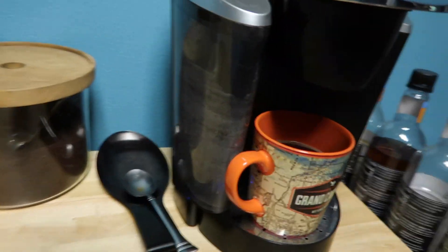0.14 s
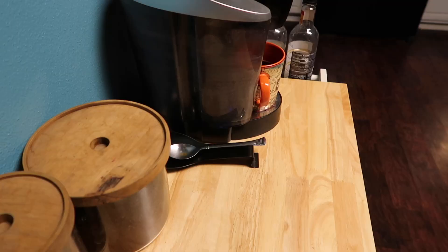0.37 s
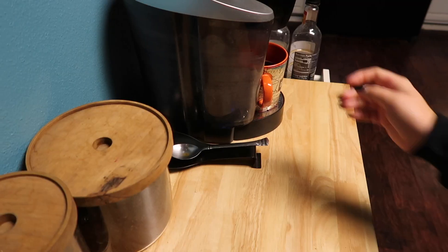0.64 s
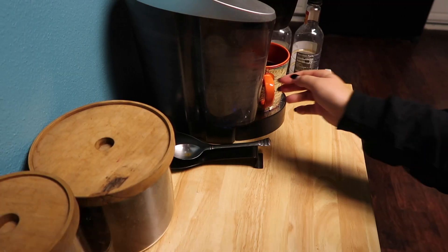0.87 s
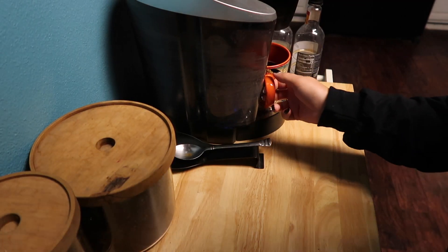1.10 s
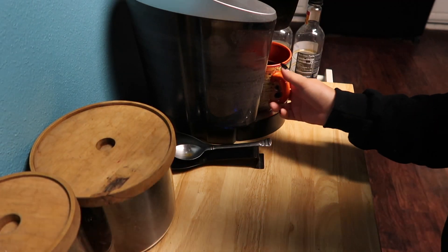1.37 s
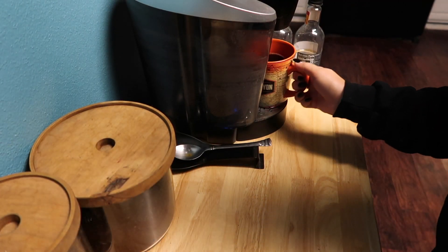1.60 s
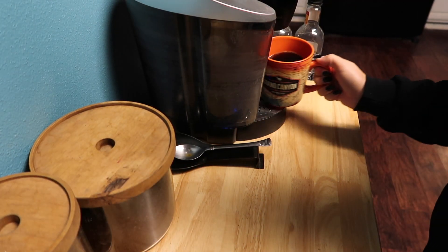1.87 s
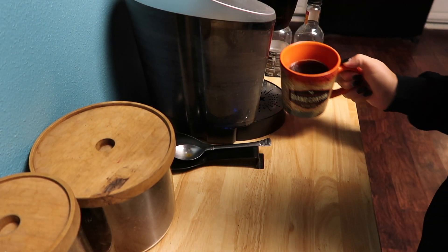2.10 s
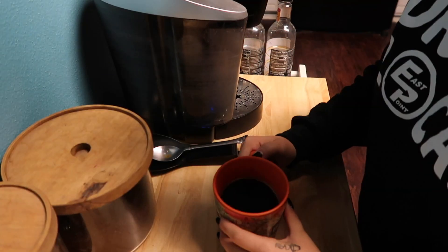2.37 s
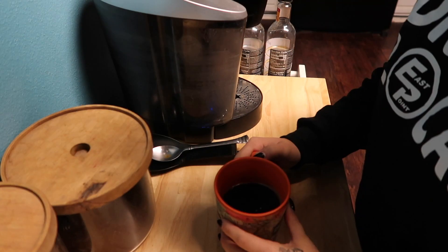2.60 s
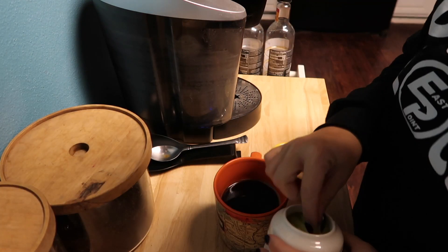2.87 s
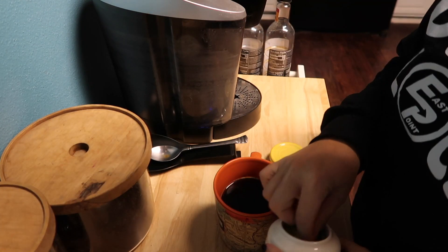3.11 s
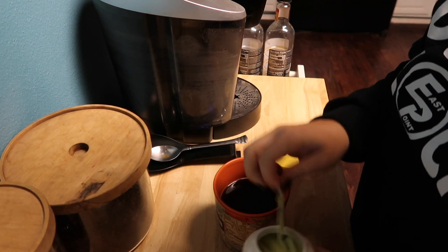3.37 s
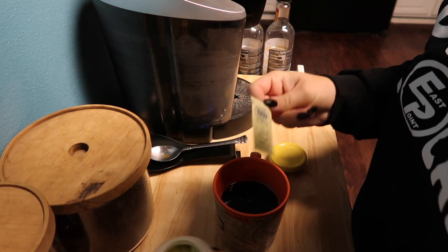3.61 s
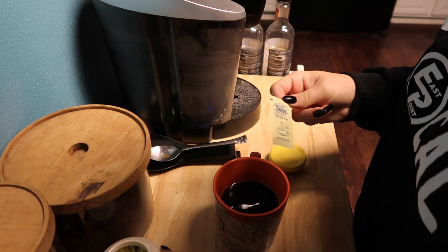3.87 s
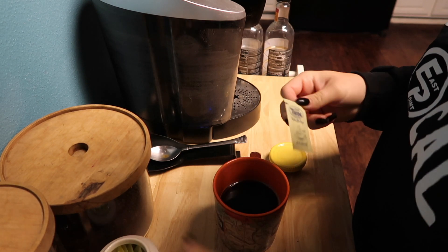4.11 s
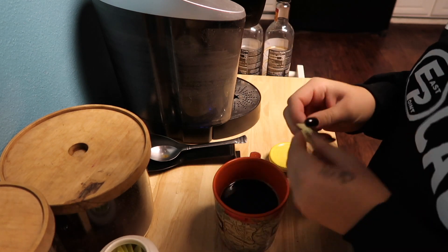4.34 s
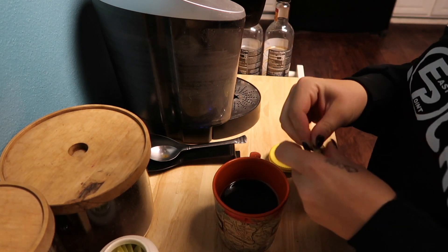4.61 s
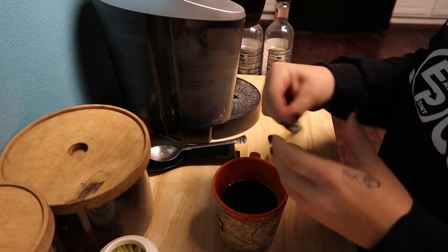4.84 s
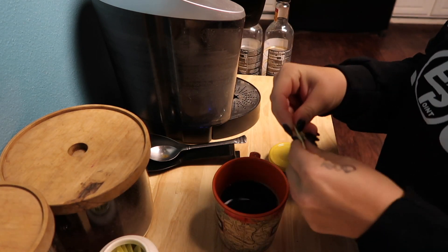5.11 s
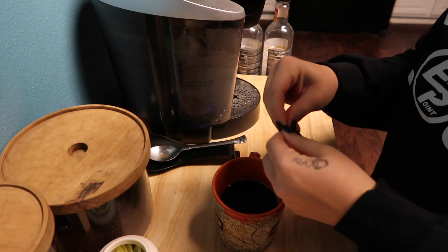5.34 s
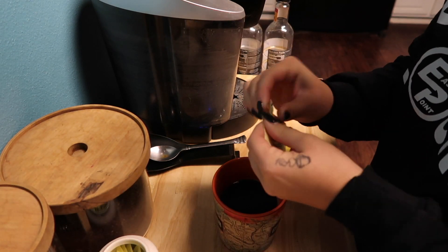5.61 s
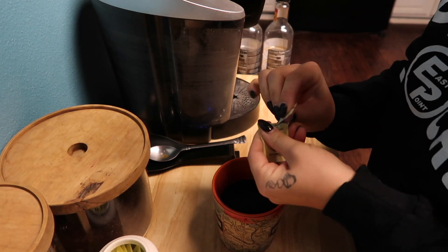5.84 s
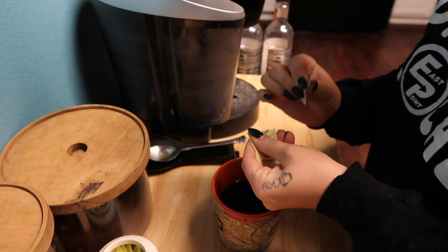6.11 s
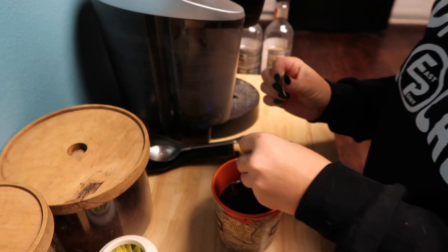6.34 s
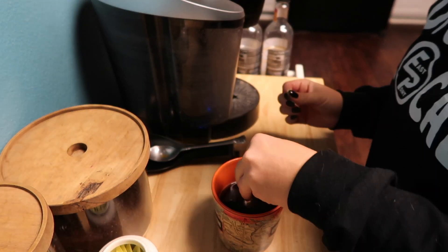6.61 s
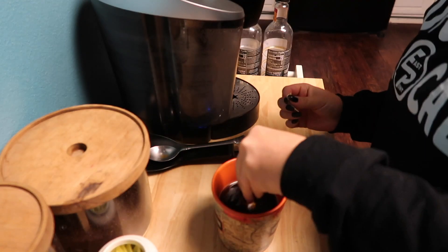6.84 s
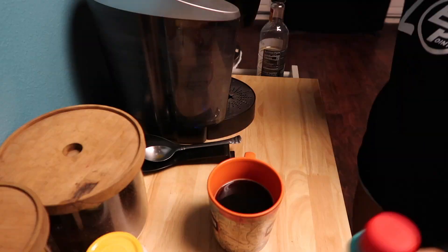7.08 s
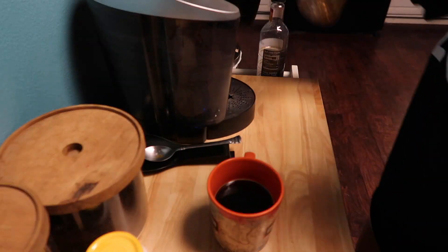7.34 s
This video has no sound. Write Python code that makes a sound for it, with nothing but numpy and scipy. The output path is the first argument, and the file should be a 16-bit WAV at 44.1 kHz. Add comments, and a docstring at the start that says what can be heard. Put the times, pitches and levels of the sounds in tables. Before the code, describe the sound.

A close stereo camera microphone in a small, lightly reverberant kitchen; soft room air throughout. From 0 to 0.5 s, hands thump, creak and brush the camera, ending in a hard knock. Plastic tray knocks come at 1.1 and 1.6, with a nail tick at 1.2 and a gritty mug scrape and low tray hum from 1.3 to 1.75. At 2.4 the full mug lands in a quick double thud with cabinet boom and short slide. Faint scuffs follow, tiny glazed ticks at 3.07, then rummaging and paper flicks until 3.75. At 3.9 a jar lands loudest, bounces at 4.0 and wobbles still. From 4.4 to 5.75 paper crackles with dense, sharp snaps and tearing; a last rip comes near 6.1, a rim rasp at 6.5, sparse crinkles until 6.95. A faint low motor wavers from 2.6 to 7.1. Knocks and handling thumps finish at 7.1-7.5.

```python
"""Paper is flicked, crumpled and torn on a wooden counter, close to a small stereo camera: clicks and ringing snaps.
Before that small objects knock, a mug is dragged off a drip tray and set down, and a jar lands and bounces:
modes that ring when struck, and gritty friction through resonances. Hands thump, creak and brush on the camera shell.
Under it lie smooth room air, shaped noise, and a distant motor, wavering multiples of a slow shaft."""
import sys
import numpy as np
from scipy import signal
from scipy.fft import rfft, irfft, next_fast_len
from scipy.io import wavfile
from scipy.ndimage import uniform_filter1d

SR = 44100
rng = np.random.default_rng(int(sys.argv[2]) if len(sys.argv) > 2 else 0)


def store_pcm(level_fs):
    """Save levels as 16-bit WAV."""
    pcm = np.round(np.clip(level_fs, -1, 1) * 32767).astype(np.int16)
    wavfile.write(sys.argv[1], SR, np.atleast_2d(pcm).T)


def decibels_to_gain(level_db):
    """Convert a level in decibels to a linear amplitude gain (20 dB per decade)."""
    exponent = np.asarray(level_db, float) / 20
    return 10 ** exponent


N = 329210
T = np.arange(N) / SR


def shape(x, table, turn=1):
    """Filter by (Hz, dB) points joined on a log axis; turn=1j adds a quarter-cycle phase shift."""
    hz, db = np.transpose(table)
    size = next_fast_len(len(x))
    f = np.fft.rfftfreq(size, 1 / SR) + 1
    curve = decibels_to_gain(np.interp(np.log(f), np.log(hz), db))
    return irfft(rfft(x, size) * turn * curve, size)[:len(x)]


def unit(x):
    """Scale to rms 1."""
    return x / np.sqrt(np.mean(x ** 2))


def band(x, lo_hz, hi_hz, order=2):
    """Band-pass."""
    edges = [lo_hz, min(hi_hz, .45 * SR)]
    return signal.sosfilt(signal.butter(order, edges, "band", fs=SR, output="sos"), x)


def gain(table, index):
    """Level column as a gain, silent outside the table."""
    rows = np.array(table)
    return decibels_to_gain(np.interp(T, rows[:, 0], rows[:, index], left=-200, right=-200))


def strokes(rows):
    """Gain of movements that rise from 30 dB under their top, hold, and fall as far again."""
    out = 0
    for s, db, rise, hold, fall in rows:
        times = s + np.cumsum([-rise, rise, hold, fall])
        levels = db - 30 * np.array([1, 0, 0, 1])
        out = out + gain(np.transpose([times, levels]), index=1)
    return out


def walk(rate):
    """Random levels held 1 / rate s, smoothed twice and scaled to rms 1."""
    k = int(SR / rate)
    steps = np.repeat(rng.standard_normal(N // k + 1), k)
    return unit(uniform_filter1d(uniform_filter1d(steps, k), k)[:N])


def grains(rate, spread_db):
    """Random clicks, rate per second on average, a few much larger than the rest."""
    hits = rng.random(N) < rate / SR
    return unit(hits * rng.standard_normal(N) * decibels_to_gain(spread_db * rng.exponential(size=N)))


def rings(x, peaks, wander_ms=0):
    """Sum of steep resonances, each applied twice; under a moving contact each wanders in pitch and level."""
    out = 0
    for hz, width, db in peaks:
        # each pass is wider, so that the pair has about the given width
        b, a = signal.iirpeak(hz, hz / (1.5 * width), SR)
        ring = unit(signal.lfilter(b, a, signal.lfilter(b, a, x)))
        if wander_ms:
            drifting = np.interp(T + wander_ms / 1000 * walk(14), T, ring)
            ring = decibels_to_gain(1.6 * walk(30)) * drifting
        out = out + decibels_to_gain(db) * np.sqrt(width) * ring
    return unit(out)


def add(out, s, sound):
    """Mix a short sound in at time s."""
    i = int(s * SR)
    out[i:i + len(sound)] += sound[:N - i]


def knocks(events, modes, crack_s, rattle_s, thud_db, order=1):
    """Each blow pushes the modes once; loose parts go on rattling them; a short bright crack on top."""
    out, t = np.zeros(N), T[:SR // 2]
    ring = 0
    for k, (hz, db, t60) in enumerate(modes):
        # order 0: a flat base starts all modes the same way; order 1: neighbours start opposed
        sign = (-1) ** (k * order)
        ring = ring + sign * decibels_to_gain(db) * np.sin(2 * np.pi * hz * t) * 1000. ** (-t / t60)
    # a blow takes about a millisecond to set the panel swinging
    ring = ring * (1 - np.exp(-t / 0.00094))
    # the first swings are larger, until the energy has spread over the panel
    ring = ring * (1 + decibels_to_gain(thud_db) * np.exp(-t / 0.011))
    # a small object radiates little below its lowest mode
    ring = signal.sosfilt(signal.butter(3, 1.05 * modes[0][0], "high", fs=SR, output="sos"), ring)
    for s, db, crack_db, contact_ms, rattle_db in events:
        push = np.hanning(int(max(contact_ms, .02) * SR / 1000) + 3)
        blow = np.convolve(ring, push)[:len(t)]
        shake = rng.standard_normal(len(t)) * 1000. ** (-t / rattle_s)
        rattle = signal.fftconvolve(blow * 1000. ** (-t / 0.021), shake)[:len(t)]
        crack = band(rng.standard_normal(len(t)), 2500, 6380) * 1000. ** (-t / crack_s)
        hit = blow / np.abs(blow).max() + decibels_to_gain(rattle_db) * rattle / np.abs(rattle).max()
        add(out, s, decibels_to_gain(db) * (hit + decibels_to_gain(crack_db) * crack))
    return out


# Room air colour. Each row: frequency in Hz, relative level in dB per Hz.
AIR_COLOUR = [(15, -51), (25, -11), (39, -11), (59, -0.5), (86, -7), (108, -2.5), (171, -3.5), (329, -7.5),
              (364, -9), (1320, -19), (1700, -23.5), (2030, -23.5), (3370, -27), (4920, -32),
              (10500, -40.5), (13600, -57), (22000, -120)]
# Colour of its left-minus-right part. Each row: frequency in Hz, relative level in dB per Hz.
AIR_SIDE_COLOUR = [(15, -45), (25, -31), (147, -4), (425, -4), (511, -10), (1130, -13), (3930, -20),
                   (4480, -19), (6500, -31), (12900, -21.5), (14000, -34)]
# Room air over time. Each row: time in seconds, level in dB.
AIR_LEVEL = [(0.0, -49.5), (0.3, -42.5), (0.5, -49.5), (1.06, -44.5), (1.4, -47.5), (1.81, -47.5),
             (7.1, -50), (7.47, -45.5)]


def air():
    """Smooth room noise; the second row is the unrelated left-right difference."""
    mid = shape(rng.standard_normal(N), AIR_COLOUR)
    side = shape(rng.standard_normal(N), AIR_SIDE_COLOUR)
    mid = mid / np.std(band(mid, 204, 1900))
    side = decibels_to_gain(-7.0) * side / np.std(band(side, 245, 1300))
    return gain(AIR_LEVEL, 1) * decibels_to_gain(1.0 * walk(9)) * np.array([mid, side])


# Distant motor. Each row: time in seconds, shaft speed in Hz, level of multiple 2 in dB,
# level of multiple 1 in dB, which multiple 3 follows.
MOTOR_RUN = [(2.55, 62.8, -44.5, -63), (2.78, 60.1, -48, -66), (2.9, 60.2, -40, -64),
             (3.17, 60, -40.5, -63), (3.28, 62, -49, -73), (3.5, 62.5, -46, -50.5),
             (4.35, 61.66, -47.5, -53), (4.52, 62.1, -51.5, -54), (4.68, 60.9, -39.5, -42),
             (4.9, 57.6, -38, -47), (5.07, 57.2, -47.5, -42), (5.55, 58.15, -42.5, -43),
             (5.73, 57.9, -50, -57), (6.11, 58.3, -52, -52.5), (6.28, 58.2, -51.5, -46),
             (6.74, 58.4, -49, -43.5), (7.1, 56.8, -46.5, -64)]
# A second low tone that swells for a moment. This and every table of strokes below, each row:
# time of reaching the top in seconds, level in dB, then rise, hold and fall in seconds.
DRONE_SWELL = [(4.97, -46, 0.58, 0.225, 0.57)]


def motor():
    """Three wavering multiples of a slow shaft, and a passing low tone."""
    phase = 2 * np.pi * np.cumsum(np.interp(T, *np.transpose(MOTOR_RUN)[:2])) / SR
    first, second = gain(MOTOR_RUN, index=3), gain(MOTOR_RUN, index=2)
    levels = first, second, decibels_to_gain(-2.5) * first
    stack = 0
    for k, level in enumerate(levels):
        tone = np.sin((k + 1) * phase + 0.96 * walk(4.0))
        stack = stack + level * decibels_to_gain(walk(5)) * tone
    drone = strokes(DRONE_SWELL) * np.sin(2 * np.pi * 217.4 * T + 0.33 * walk(6.6))
    return np.sqrt(2) * (stack + drone)


# Hands shift on the camera body: strokes of the thumps, creaks and cloth brushes.
THUMP_STROKES = [(.19, -32.5, 0.12, 0.034, 0.11), (.35, -58, .03, .005, .07),
                 (7.126, -37, 0.036, 0.0044, 0.15), (7.305, -30, 0.023, 0.015, 0.15),
                 (7.452, -29.5, 0.05, .004, 0.038)]
CREAK_STROKES = [(.01, -43, .05, .005, 0.16), (.12, -44, 0.057, 0.0046, 0.03), (.15, -46, 0.11, 0.1, 0.19),
                 (.33, -39, 0.062, 0.059, 0.045), (7.126, -43, 0.12, 0.155, 0.037),
                 (7.33, -42, 0.07, 0.046, .05), (7.455, -35.5, 0.19, .004, .03)]
BRUSH_STROKES = [(.0, -40.5, .05, .005, 0.23), (.15, -34, 0.031, 0.0028, 0.12),
                 (.25, -45.5, 0.2, 0.12, 0.2)]
# Resonances of the shell. Each row: frequency in Hz, width in Hz, relative level in dB.
THUMP_RINGS = [(78.4, 76, 8), (147, 33, -13), (42, 30, 4)]
CREAK_RINGS = [(317, 78, 8), (446, 40, 0), (810, 93, -9), (1490, 110, -12.5), (1980, 180, -15)]
# Cloth colour. Each row: frequency in Hz, relative level in dB per Hz.
CLOTH_COLOUR = [(410, -41), (700, -26), (786, -10), (902, -2), (1450, 8), (1740, 5.5), (2630, 1.5),
                (6330, -4.5), (11000, -27), (14300, -66), (22000, -120)]


def grip():
    """Thumps and creaks are grains through shell resonances; the brush of cloth is shaped grains."""
    thumps = strokes(THUMP_STROKES) * rings(grains(200, 0.82), THUMP_RINGS)
    creaks = strokes(CREAK_STROKES) * rings(grains(1500, 0.8), CREAK_RINGS)
    brushes = strokes(BRUSH_STROKES) * unit(shape(grains(6000, 0.49), CLOTH_COLOUR))
    return thumps + creaks + brushes


# The camera shell knocks in the hand. This and every table of blows below, each row: start in seconds,
# level in dB, crack in dB, contact in ms (three samples are added), rattle in dB.
SHELL_BLOWS = [(0.109, -36, -30, 0.83, 0.5), (0.193, -30.5, -30, 1, -12), (0.342, -29, -32, 0.63, -14),
               (7.459, -43, -30, 0.65, -4)]
# Modes of the shell. This and every table of modes below, each row: frequency in Hz,
# relative level in dB, 60 dB decay in seconds.
SHELL_MODES = [(202, -11, 0.1), (328, 7, 0.067), (358, -3, 0.08), (422.5, 10, 0.28), (810, 7, 0.12)]


def shell_knocks():
    """Blows ring the few low modes of the shell."""
    return knocks(SHELL_BLOWS, SHELL_MODES, .03, 0.12, -27)


# A fingernail meets the mug: blows, then modes of the mug.
NAIL_BLOWS = [(1.224, -26, -9, 0.1, -7), (2.775, -41, -20, 0.13, -5), (7.327, -41.5, -23, .1, -23)]
MUG_MODES = [(920, -2, .04), (1750, 0, .05), (2880, -3, .035), (4300, -20, .12)]


def handle_ticks():
    """Brief nail contacts ring the short-lived modes of the mug."""
    return knocks(NAIL_BLOWS, MUG_MODES, 0.034, 0.036, 5)


# A ring or nail ticks on the glazed jar: blows, then modes of the jar.
JAR_BLOWS = [(3.0684, -38.5, 8, 0.05, 1), (3.0865, -47, 7, 0.05, 16)]
JAR_MODES = [(4300, -14, .05), (4600, -5, .2), (4655, 0, .36), (4760, -10, .12), (4883, -12, .06)]


def jar_ticks():
    """Very brief contacts ring a tight cluster of high glaze modes."""
    return knocks(JAR_BLOWS, JAR_MODES, 0.027, 0.043, 5.0)


# A hollow jar knock at 3.5 s, then a jar landing and bouncing, and late knocks: blows,
# then the one set of modes they all ring.
JAR_AND_LATE_BLOWS = [(3.502, -34, -25, 0.53, -1), (3.8979, 0, -29, 0.52, -10),
                      (3.999, -10, -48, 1.14, -8.5), (4.087, -25, -23, 1.8, -19),
                      (4.149, -29, -42, 1.6, -5), (4.176, -43, -42, 0.9, -1), (4.212, -44, -42, 0.97, -5),
                      (4.238, -39, -38, .9, -8), (4.295, -36, -42, 1.1, -2), (7.296, -24, -32, 0.57, -3.5),
                      (7.443, -34.5, -30, 0.32, 3)]
JAR_AND_LATE_MODES = [(158, -12.5, 0.17), (181, -0.5, 0.18), (248, -0.5, 0.074), (357.5, 3.5, 0.25),
                      (474, 7, 0.11), (505, 3, 0.11), (537, 2, 0.053), (703, 3.5, 0.12), (834, 1.5, 0.12),
                      (1045, -2, 0.091), (1350, -7, 0.081), (1500, 1, 0.027), (1870, -8, 0.036),
                      (2100, -9.5, 0.027), (2600, -9, .035)]


def jar_and_late_knocks():
    """Each blow starts all modes of one shared set the same way, with a strong first thud."""
    return knocks(JAR_AND_LATE_BLOWS, JAR_AND_LATE_MODES, 0.17, 0.079, 8.9, order=0)


# The jar wobbles on its base until it stands still: strokes.
WOBBLE_STROKES = [(3.93, -27.5, .03, 0.02, 0.26), (4.1, -38, 0.11, 0.026, 0.44),
                  (4.25, -50, .15, 0.12, .25)]
# Each row: frequency in Hz, width in Hz, relative level in dB.
WOBBLE_RESONANCES = [(188, 67, 3.5), (269, 38, 2), (360, 37, 8), (474, 70, -4), (567, 47, -4),
                     (700, 77, -5.5), (880, 165, -9.5)]


def wobble():
    """Sparse contact grains ring low resonances."""
    return strokes(WOBBLE_STROKES) * rings(grains(1500, 1.0), WOBBLE_RESONANCES)


# Knocks of small objects, some on the plastic drip tray: blows, then the one set of modes they all ring.
SMALL_BLOWS = [(0.464, -16.5, -29, 0.38, -16), (1.081, -12, -1, 0.94, -2), (1.6, -14, -13.5, 0.13, 3.5)]
SMALL_MODES = [(179, -26, .12), (224, 10, 0.048), (270, -13, 0.063), (349.3, 6, 0.19), (453, -14, 0.03),
               (460, -7, 0.17), (587, 0.5, 0.098), (662, 7.5, 0.024), (847, 6.5, 0.021), (1056, -1, 0.053),
               (1210, -2, 0.061), (1305, 1, 0.036), (1590, -3, 0.056), (1860, -5, 0.046), (2110, -6, 0.022),
               (2485, -6.5, 0.044), (3180, -11.5, .05), (4250, -12, .05)]


def small_knocks():
    """Blows ring many modes of one shared set, neighbours opposed, with a long rattle."""
    return knocks(SMALL_BLOWS, SMALL_MODES, 0.061, 0.23, 2.0)


# The full mug lands, so the cabinet booms: blows, then modes of the cabinet.
MUG_BLOWS = [(2.372, -19, -26, 0.49, -3), (2.384, -17.5, -27, 0.45, -8), (2.411, -24.5, -38, 1.15, -6.5),
             (2.424, -26.5, -30, 1.23, 1.5)]
CABINET_MODES = [(80, 2.5, 0.3), (192, -2, 0.11), (228, -3, 0.062), (373, -17, 0.37), (468, 3, 0.037),
                 (607, -5, 0.16), (687, -3, 0.07), (880, -7.5, 0.039), (1125, -7.5, 0.046),
                 (1530, -1.5, 0.019), (1860, -2.5, 0.034)]


def mug_landing():
    """A heavy landing rings the cabinet down to its deep lowest mode."""
    return knocks(MUG_BLOWS, CABINET_MODES, 0.27, 0.42, 3.4)


# The mug base is dragged over the tray ribs, then off the last rib; the tray hums; the base grinds to rest
# on the wood; the glaze sings; a faint banded hiss comes and goes: strokes of each.
DRAG_STROKES = [(1.328, -33, 0.061, 0.14, 0.7), (1.55, -44, 0.14, 0.012, 0.04),
                (1.752, -39.5, 0.11, 0.0057, 0.053)]
HUM_STROKES = [(1.32, -35.5, 0.15, 0.018, 0.22), (1.465, -34.5, 0.1, 0.03, 0.064),
               (1.552, -41, 0.033, .008, .05), (1.71, -43.5, 0.06, 0.02, 0.053)]
SLIDE_STROKES = [(2.385, -32.5, 0.045, 0.03, 0.25)]
LIFT_STROKES = [(1.756, -37, 0.1, .003, 0.027)]
HISS_STROKES = [(1.85, -57, 0.09, 0.47, .2), (6.6, -64, 0.11, 0.32, .05)]
# Resonances of each, in the same order. Each row: frequency in Hz, width in Hz, relative level in dB.
DRAG_RESONANCES = [(536, 32, -5), (610, 240, 6), (850, 84, 6), (1130, 170, 1.5), (1420, 136, 6),
                   (1716, 130, 7.5), (2140, 520, 0.5), (2820, 56, 0.5), (3230, 470, -5), (4200, 540, -8.5),
                   (5720, 1600, -12), (6650, 12000, -26)]
HUM_RESONANCE = [(209.6, 24, 0)]
SLIDE_RESONANCES = [(85, 45, 7), (190, 59, 16), (463, 140, 2.5), (674, 180, -10), (1110, 140, -12),
                    (1500, 250, -5), (2010, 220, -5.5), (2330, 170, -14)]
GLAZE_RESONANCES = [(1284, 41, -2.5), (1837, 28, -1), (3924, 21, -5.5), (4460, 22, -16), (5500, 70, -13),
                    (6160, 50, -13), (7100, 38, -24)]
HISS_RESONANCES = [(2050, 140, -0.5), (2510, 75, -6), (2800, 270, -8), (3410, 240, -2), (4120, 70, -7)]


def drag():
    """Stick-slip grit under the mug rings tray, wood and glaze; the loose tray hums along."""
    grit = grains(12000, .7) * decibels_to_gain(.7 * walk(60))
    scrape = strokes(DRAG_STROKES) * rings(grit, DRAG_RESONANCES, wander_ms=0.3)
    hum = strokes(HUM_STROKES) * rings(grit, HUM_RESONANCE, wander_ms=0.3)
    slide = strokes(SLIDE_STROKES) * rings(grit, SLIDE_RESONANCES)
    glaze = strokes(LIFT_STROKES) * rings(grit, GLAZE_RESONANCES)
    hiss = strokes(HISS_STROKES) * rings(rng.standard_normal(N), HISS_RESONANCES, wander_ms=0.3)
    return scrape + hum + slide + glaze + hiss


# Lid, sleeve and packet scuff over things: strokes.
SCUFF_STROKES = [(2.52, -47, 0.24, 0.0045, 0.22), (2.728, -47, 0.024, .003, .05),
                 (2.772, -40, 0.012, 0.0045, 0.22), (6.505, -45.5, 0.016, 0.0066, 0.62)]
# Each row: frequency in Hz, relative level in dB per Hz.
SCUFF_COLOUR = [(710, -24), (1200, -2), (1810, 0.5), (1940, -3.5), (6490, -5), (9500, -31), (10500, -78),
                (13600, -104), (22000, -120)]


def scuffs(body):
    """Uneven friction grains, coloured, over a little of the dull paper body."""
    return strokes(SCUFF_STROKES) * (unit(shape(grains(5900, 2.1), SCUFF_COLOUR)) + decibels_to_gain(-11) * body)


# Fingers rummage among the packets in the jar: strokes.
RUMMAGE_STROKES = [(3.36, -45, .08, .07, 0.098), (3.51, -51, .03, .025, 0.094), (3.6, -56.5, .06, .03, .1)]
# Each row: frequency in Hz, width in Hz, relative level in dB.
HOLLOW_RESONANCES = [(400, 66, -5), (618, 54, 7), (980, 140, -2), (1520, 300, -17)]


def rummage():
    """Scattered contacts ring the hollow of the jar."""
    return strokes(RUMMAGE_STROKES) * rings(grains(1500, 1.5), HOLLOW_RESONANCES, wander_ms=0.3)


# The packet rasps over the mug rim: strokes.
RASP_STROKES = [(6.503, -36, .012, 0.0064, .03), (6.514, -37, 0.023, 0.0088, 0.037),
                (6.535, -49, .02, .02, 0.048)]
# Each row: frequency in Hz, width in Hz, relative level in dB.
RASP_RESONANCES = [(796, 210, -2.5), (1280, 87, -0.5), (1740, 470, -5.5), (2240, 180, 2.5),
                   (3020, 610, -11), (3770, 640, -16)]


def rasp():
    """Friction grains ring broad, wandering resonances."""
    return strokes(RASP_STROKES) * rings(grains(3000, 1.2), RASP_RESONANCES, wander_ms=0.3)


# Paper colour. Each row: frequency in Hz, relative level in dB per Hz.
PAPER_COLOUR = [(600, -43), (1000, -18), (1500, -20), (2400, -5.5), (4000, -6), (7200, -4), (8700, -13.5),
                (10000, -9.5), (11500, -9.5), (13000, -18), (15200, -20.5), (16300, -50)]
# Single creases that snap. Each row: start in seconds, level in dB, pitch in Hz, body in dB.
CREASE_SNAPS = [(2.724, -37.5, 2860, -18), (3.236, -36.5, 3960, -9), (3.335, -36, 4930, -5),
                (3.364, -37, 4040, -1.5), (3.38, -28, 5550, -21), (3.409, -27.5, 2810, -4.5),
                (3.453, -38.5, 3600, 2), (3.562, -38, 3620, -8), (3.598, -41.5, 3700, -9),
                (3.652, -45, 4200, -13), (3.693, -37.5, 4560, -14), (3.709, -44.5, 2600, 6),
                (3.748, -29.5, 4920, -13), (4.252, -43, 5000, -22), (4.274, -42, 3500, -20),
                (4.311, -29.5, 4500, -22), (4.411, -17.5, 6400, -8.5), (4.4233, -17, 4640, -10),
                (4.488, -28, 3830, -8), (4.545, -27.5, 3030, -9), (4.617, -27, 6900, -14),
                (4.659, -28, 2390, -5), (4.718, -20.5, 5500, -11), (4.7425, -19.5, 5600, -14.5),
                (4.775, -30, 2330, -11), (4.828, -19.5, 2544, -23), (4.837, -14.5, 6730, -19),
                (4.884, -27.5, 4330, -2.5), (4.906, -22.5, 8140, -32), (4.971, -25, 3900, -12),
                (5.008, -28, 5870, -23), (5.018, -18.5, 2455, -10.5), (5.075, -22.5, 5300, -13),
                (5.083, -21.5, 3630, -3.5), (5.125, -27.5, 2640, -24), (5.226, -27, 5300, -29),
                (5.246, -30, 4600, -5), (5.2836, -17.5, 6140, -11.5), (5.378, -34, 4790, -34),
                (5.394, -16, 6040, -43), (5.5386, -15, 3280, -12.5), (5.554, -11.5, 2460, -6),
                (5.705, -30.5, 3615, -29), (5.719, -23.5, 8050, -29), (5.749, -28.5, 5510, -38),
                (6.1147, -31, 6270, 4.5), (6.3923, -21.5, 5500, -13.5), (6.545, -33.5, 3220, -20),
                (6.58, -23, 6060, -24), (6.916, -40, 3970, 7.5), (6.9478, -27.5, 6200, -8)]


def snaps():
    """Creases ring the stiff sheet briefly; also returns the gain of the crackle that follows each."""
    out, settle = np.zeros(N), np.zeros(N)
    t = T[:SR // 10]
    # a sharp front, then the crease rings out
    fade = (1000. ** (-t / 0.043) + 1.25 * np.exp(-t / 0.0017)) * (1 - np.exp(-t / 0.00071))
    for s, db, hz, body_db in CREASE_SNAPS:
        noise = rng.standard_normal((3, len(t)))
        # the crease gives way in a ragged run of smaller cracks
        ragged_db = 3 * np.repeat(noise[2], 30)[:len(t)]
        noise = noise * fade * decibels_to_gain(ragged_db)
        pitched = unit(band(noise[0], hz / 1.16, hz * 1.138))
        snap = unit(shape(noise[0], PAPER_COLOUR)) + decibels_to_gain(-1.0) * pitched
        low = band(noise[1], 540, 1410)
        add(out, s, decibels_to_gain(db) * (snap / np.abs(snap).max() + decibels_to_gain(body_db) * low / np.abs(low).max()))
        add(settle, s, decibels_to_gain(db - 17) * 1000. ** (-t / 0.094))
    return out, settle


# The paper peels and tears: strokes.
TEAR_STROKES = [(4.43, -33.5, 0.042, 0.0037, 0.031), (4.885, -32, 0.022, 0.011, 0.048),
                (5.832, -41.5, 0.016, 0.059, 0.15), (5.9, -42, 0.16, 0.029, 0.099),
                (6.08, -39.5, 0.02, 0.026, 0.055), (6.112, -32.5, 0.062, 0.006, 0.028)]


def tears():
    """Dense fibre clicks with a fast uneven level, in the paper colour."""
    fibres = grains(12000, 0.87) * decibels_to_gain(2.2 * walk(120))
    return strokes(TEAR_STROKES) * unit(shape(fibres, PAPER_COLOUR))


# Fingers at work on the paper. Each row: time in seconds, level of the steady crackle in dB.
CRACKLE_LEVEL = [(3.2, -74), (3.4, -49.5), (3.46, -66), (3.87, -76), (4.37, -58.5), (4.45, -56),
                 (4.7, -49.5), (4.95, -47.5), (5.12, -51.5), (5.21, -53), (5.35, -46), (5.62, -48),
                 (5.81, -57.5), (6.2, -60.5), (6.55, -56.5), (7.05, -69.5)]
# The packet body is squeezed: strokes.
PRESS_STROKES = [(3.4, -69, 0.17, 0.012, 0.17), (4.43, -34.5, 0.044, 0.0042, 0.041),
                 (4.83, -35, 0.034, 0.0034, 0.026), (4.89, -40, 0.021, 0.0054, 0.03),
                 (5.09, -41, 0.16, 0.0079, 0.11), (5.55, -41.5, 0.026, 0.0048, 0.033),
                 (6.11, -40.5, 0.028, .005, 0.092)]


def paper():
    """A bed of tiny crease clicks and dull finger rubbing, joined by snaps, tears and scuffs."""
    fine = shape(grains(9000, 0.97) * decibels_to_gain(3.7 * walk(170)), PAPER_COLOUR)
    fine = fine / np.std(band(fine, 1500, 11000))
    body = unit(band(grains(2000, 0.43), 280, 3100))
    bed = gain(CRACKLE_LEVEL, index=1) * decibels_to_gain(2.0 * walk(28))
    rubbing = (strokes(PRESS_STROKES) + decibels_to_gain(-4.5) * bed) * body
    snapping, settle = snaps()
    crackle = (bed + settle) * fine
    return rubbing + crackle + snapping + tears() + scuffs(body) + rummage() + rasp()


# Echo decay. Each row: frequency in Hz, 60 dB decay in seconds.
ROOM_DECAY = [(60, 0.64), (500, 0.32), (2000, 0.56), (8000, 0.33)]


def room(x):
    """Reflections: noise that dies away at its own pace in each octave; a tail each for sum and difference."""
    t, (hz, t60) = T[:SR // 2], np.transpose(ROOM_DECAY)
    tails = 0
    for f in 60 * 2. ** np.arange(9):
        octave = band(rng.standard_normal((2, len(t))), f / np.sqrt(2), f * np.sqrt(2))
        tails = tails + octave * 1000. ** (-t / np.interp(np.log(f), np.log(hz), t60))
    tails = tails * (1 - np.exp(-t / 0.0015))
    tails = tails / np.sqrt(np.sum(tails[0] ** 2))
    return signal.fftconvolve(x[None], tails, axes=1)[:, :N]


# How solid sounds reach the sum signal. Each row: frequency in Hz, gain in dB.
SOLID_TO_SUM = [(40, -5.5), (90, 0.5), (8500, -1), (10500, -3), (12000, 8), (16000, -5)]
# Left-minus-right of near sounds against their sum; the capsules fall out of phase in the treble.
# Each row: frequency in Hz, gain in dB.
SIDE_OF_NEAR = [(60, -34), (200, -21), (380, -14.5), (700, -20), (1290, -15), (2400, -10), (4400, -7),
                (6500, -4.5), (8500, 3.5), (10000, 5), (11500, 9), (13000, 6), (14500, 3), (16000, -7)]


def scene():
    """Near sounds reach both capsules with a phase offset; air and echoes differ at random."""
    ticks = handle_ticks() + jar_ticks()
    blows = jar_and_late_knocks() + small_knocks() + mug_landing()
    solid = ticks + blows + wobble() + drag()
    near = shape(solid, SOLID_TO_SUM) + paper()
    wet = room(near)  # the handled camera shell gets no echo
    near = near + shape(grip() + shell_knocks(), SOLID_TO_SUM)
    far = air()
    mid = near + decibels_to_gain(-10.5) * wet[0] + far[0] + motor()
    side = shape(near, SIDE_OF_NEAR, 1j) + decibels_to_gain(-8.0) * shape(wet[1], SIDE_OF_NEAR) + far[1]
    return np.array([mid + side, mid - side])


def top_cut(x):
    """Nothing passes above the cut-off."""
    return signal.sosfilt(signal.butter(12, 16460, fs=SR, output="sos"), x)


def record(dry):
    """The preamp rounds the loudest peak."""
    mix = np.tanh(0.58 * dry) / 0.72
    return top_cut(mix)


dry = scene()
out = record(dry)
store_pcm(out)
```